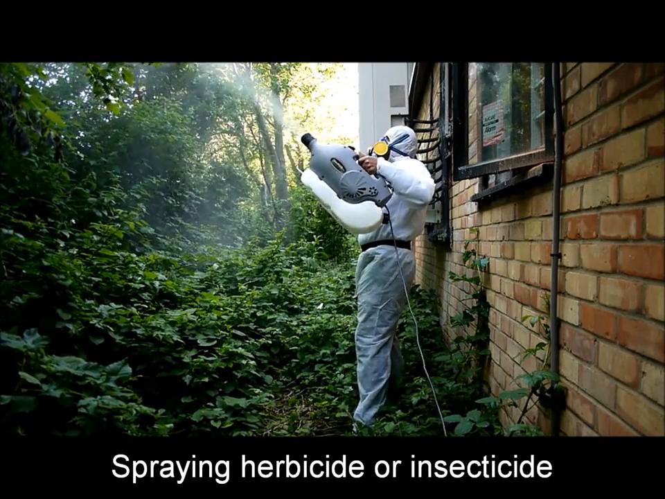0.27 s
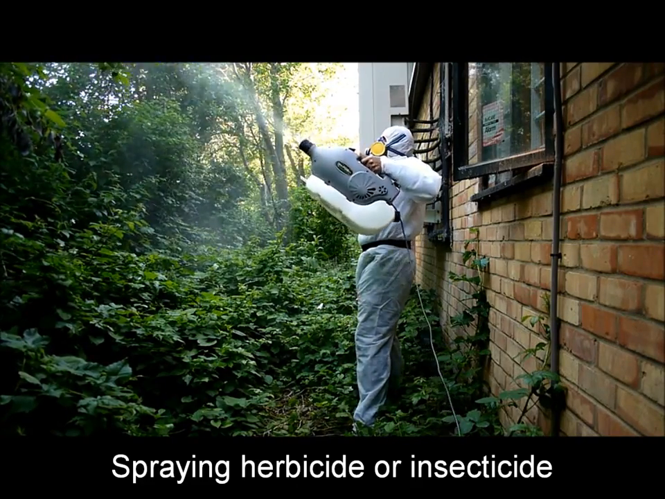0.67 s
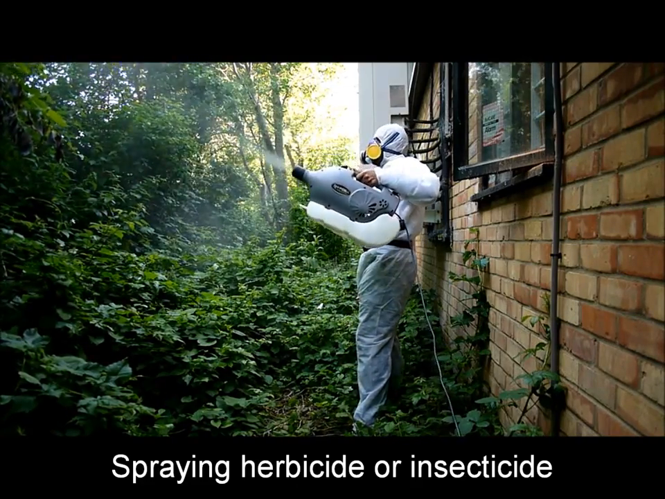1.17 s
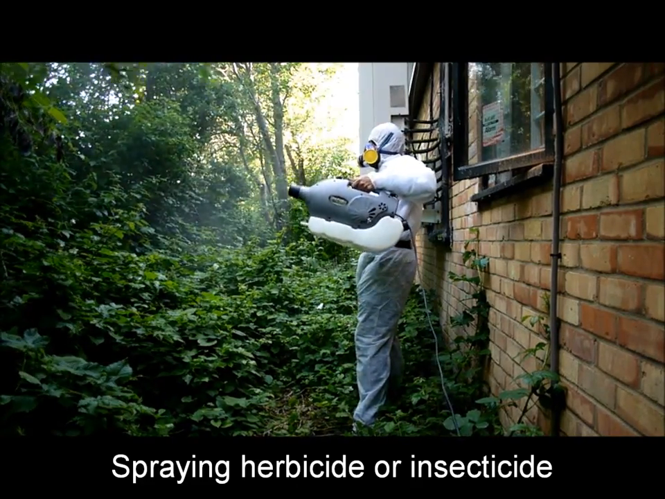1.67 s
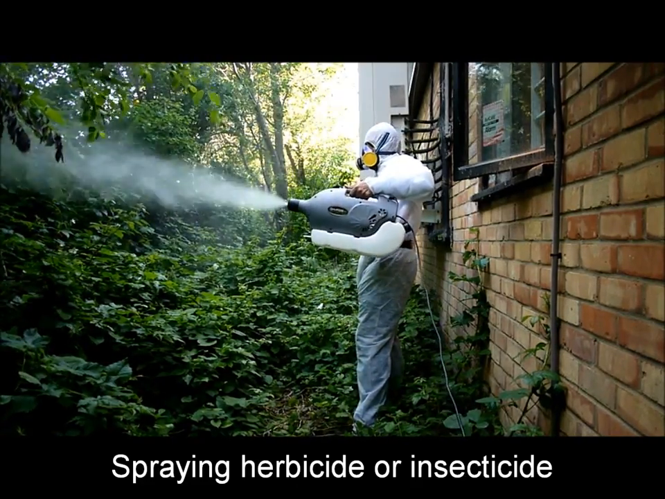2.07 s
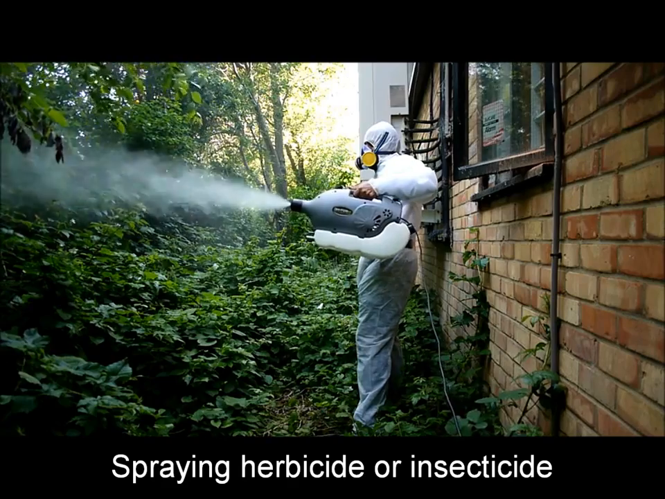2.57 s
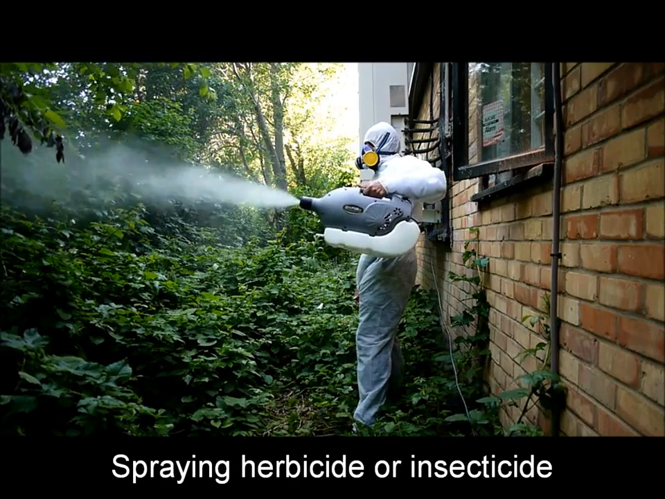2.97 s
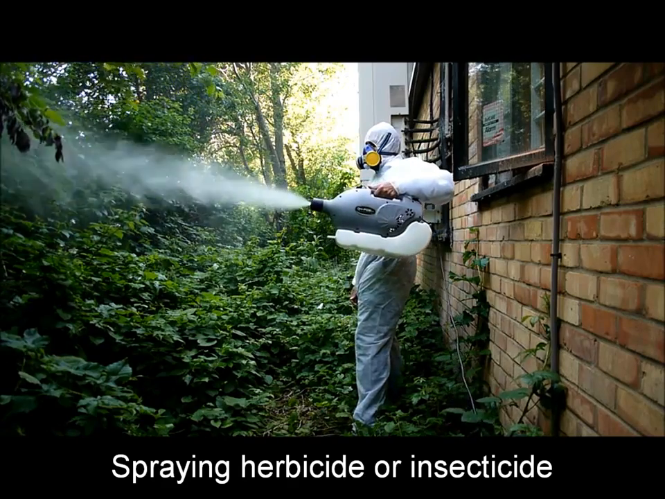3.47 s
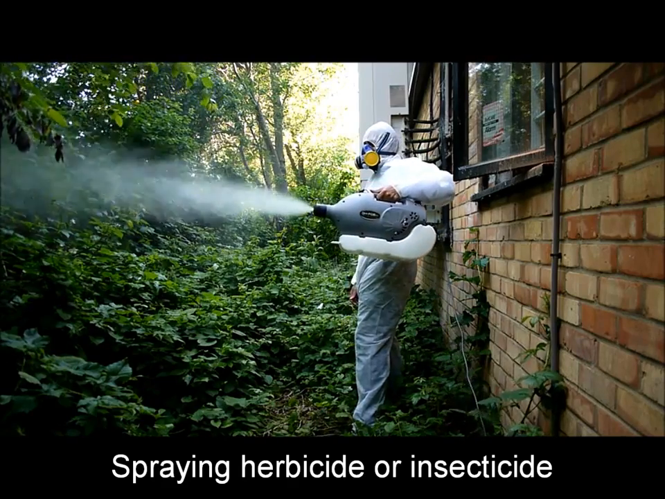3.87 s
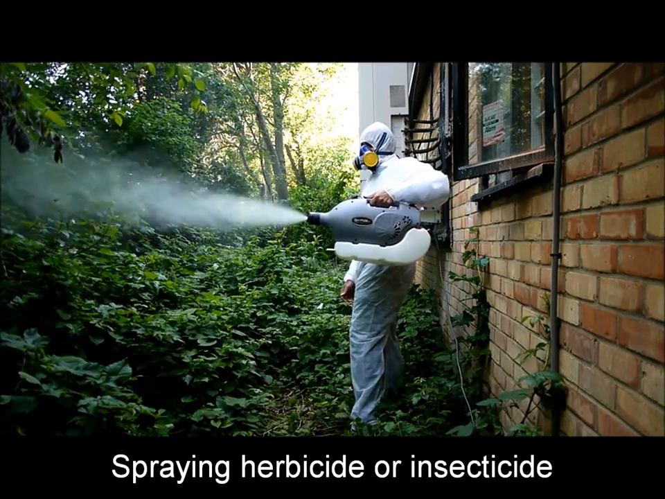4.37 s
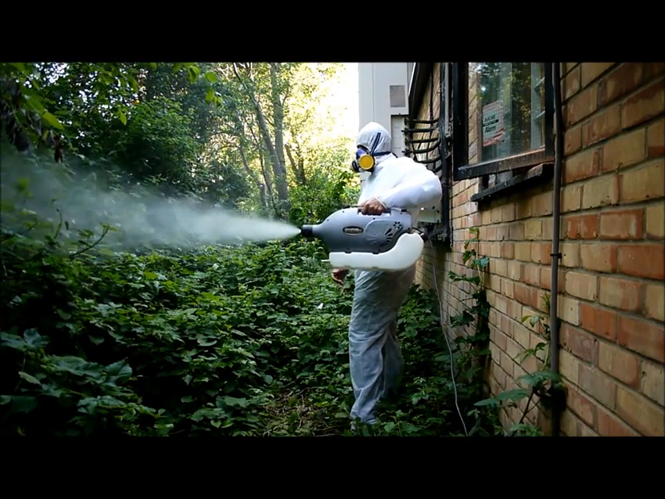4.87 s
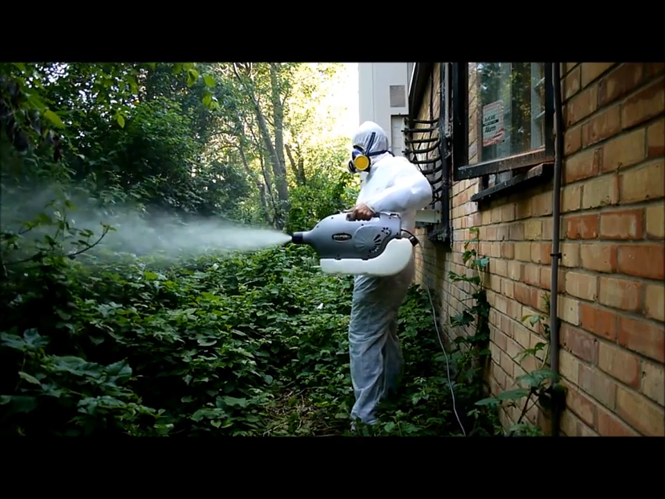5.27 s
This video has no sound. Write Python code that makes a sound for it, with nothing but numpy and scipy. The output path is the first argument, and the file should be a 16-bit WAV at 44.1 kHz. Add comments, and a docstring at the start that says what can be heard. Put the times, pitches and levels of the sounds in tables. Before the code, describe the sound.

Outdoor fogging machine, already running, heard in stereo from a few metres. A singing motor and thin high whistle ride on a strong airy hiss over faint hum and rumble. The jet gradually softens; near 1.9 seconds a tiny pop begins a gulping wet rush with more body. After 2.7 seconds it smooths into a softly hooting hiss and fades steadily to nothing.

```python
"""An overgrown garden, beside a brick wall: an electric fogger runs a few metres from the microphone.
Its motor sings a sine at the shaft rate, the nine-bladed fan whistles nine times higher, over hum and rumble.
The air jet is filtered noise, combed by echoes, and hisses softer as the raised nozzle is lowered.
The liquid valve opens: bands of noise splutter, then a soft hollow note settles. The whole sound fades away."""
import sys
import numpy as np
from scipy import signal
from scipy.fft import rfft, irfft
from scipy.io import wavfile

SR = 44100
rng = np.random.default_rng(int(sys.argv[2]) if len(sys.argv) > 2 else 0)


def dump_mix(stems):
    """Bounce the given channels to the path in sys.argv[1] as a 16-bit WAV at rate SR."""
    frames = np.atleast_2d(stems).T  # one column per channel
    limited = np.clip(frames, -1, 1)  # hard clip at full scale
    pcm = np.round(limited * 32767).astype(np.int16)
    wavfile.write(sys.argv[1], SR, pcm)


N = 244314
FRAME, HOP = 1024, 256  # samples
TIME = np.arange(N) / SR
FRAME_TIME = np.arange(N // HOP + 5)[:, None] * HOP / SR  # a column, to pair with the row of BINS
BINS = np.fft.rfftfreq(FRAME, 1 / SR)
EDGE_HZ = 7850  # top of the audible band

# The nozzle starts raised and is brought down to level in one smooth move.
LOWER_FROM_S, LOWER_TO_S = 0.16, 2.25
# The valve opens; before that only a dribble (0-1) is blown out of the raised nozzle.
VALVE_S, VALVE_RISE_S, DRIBBLE = 1.872, 0.018, 0.28
# The feed splutters until the air is out of the tube, then calms to a share of it.
PRIMED_S, SETTLE_S, CALM_SHARE = 2.7, 0.16, 0.46


def amp(db):
    """Decibels to gain."""
    return 10 ** (np.asarray(db) / 20)


def unit(x):
    """Scales to rms 1."""
    return x / np.sqrt(np.mean(abs(x) ** 2) + 1e-20)


def read(points, hz):
    """Reads a spectrum table on a log-frequency axis."""
    f, value = np.transpose(points)
    return np.interp(np.log(hz + 1), np.log(f + 1), value)


def ramp(t, start, length):
    """Goes from 0 to 1 in a straight line."""
    return np.clip((t - start) / length, 0, 1)


def wander(rate, t=TIME):
    """Slow random drift of rms 1, with rates up to about `rate` a second."""
    smooth = np.exp(-(np.fft.rfftfreq(N, 1 / SR) / rate) ** 2)
    drift = unit(irfft(rfft(rng.standard_normal(N)) * smooth, N))
    return np.interp(t, TIME, drift)


def tone(hz, db):
    """A sine that follows a pitch and an rms level, from a random starting phase."""
    cycles = np.cumsum(hz * np.ones(N)) / SR + rng.random()
    return np.sqrt(2) * amp(db) * np.sin(2 * np.pi * cycles)


# Stereo likeness of the noise: pitch_hz, correlation (left to right, 0-1)
STEREO_LIKENESS = [(60, 0.93), (250, .98), (500, 1), (1000, 0.98), (2050, 0.82), (4200, 0.7), (8000, 0.91)]


def turbulence(gain):
    """Two channels of partly alike noise, shaped by the short-time spectrum `gain`, rms 1."""
    a, b, c, d = rng.standard_normal((4, len(FRAME_TIME), len(BINS)))
    same = np.clip(read(STEREO_LIKENESS, BINS), 0, 1)
    left = a + 1j * b
    right = same * left + np.sqrt(1 - same ** 2) * (c + 1j * d)
    spectra = (np.array([left, right]) * gain).swapaxes(1, 2)
    _, noise = signal.istft(spectra, nperseg=FRAME, noverlap=FRAME - HOP)
    return unit(noise[:, :N])


def raised(t):
    """How high the nozzle points: 1 aloft, 0 level."""
    return 0.5 + 0.5 * np.cos(np.pi * ramp(t, LOWER_FROM_S, LOWER_TO_S - LOWER_FROM_S))


def valve(t):
    """How far the liquid valve is open, 0-1."""
    return ramp(t, VALVE_S, VALVE_RISE_S)


def settled(t):
    """How steady the feed is: 0 spluttering, 1 primed."""
    return ramp(t, PRIMED_S, SETTLE_S)


def liquid(t):
    """Flow and splutter, both 0-1: a dribble, then the full feed."""
    dribble = DRIBBLE * raised(t) * (1 - valve(t))
    flow = dribble + valve(t)
    uneven = dribble + valve(t) * (1 - (1 - CALM_SHARE) * settled(t))
    return flow, uneven


# Colour of the low rumble: pitch_hz, density_db (per Hz, relative)
RUMBLE_COLOUR = [(20, -40), (36, -23.5), (55, -12), (80, 4), (105, -5.5), (150, -15), (220, -17.5),
                 (500, -52.5), (2000, -89.5)]


def rumble(level_db=-63.0, raised_db=7, wet_db=3, gust_db=1):
    """The airflow's low noise is louder with the nozzle raised, and again when it carries liquid."""
    db = level_db + raised_db * raised(TIME) + wet_db * valve(TIME)
    return turbulence(amp(read(RUMBLE_COLOUR, BINS))) * amp(db + gust_db * wander(2.2))


# Hum of the windings: multiple (of 100 Hz), level_db (against the jet)
WINDING_LINES = [(1, -34.5), (2, -42)]


def hum(jet_db, mains_hz=100):
    """The windings hum at multiples of the mains hum pitch."""
    return sum(tone(k * mains_hz, jet_db + db) for k, db in WINDING_LINES)


def drone(from_hz=123.5, to_hz=172, climb_s=4.5, level_db=-59.5, raised_db=9, hold_s=2.7, release_s=2.4):
    """A low tone climbs ever more slowly, is louder with the nozzle raised, and dies away."""
    hz = from_hz + (to_hz - from_hz) * (1 - np.exp(-TIME / climb_s))  # heads for to_hz
    level = level_db + raised_db * raised(TIME)
    return tone(hz, level) * (1 - ramp(TIME, hold_s, release_s))


# Moving echoes of the fan: level_db, cancel_s (time of one cancellation), shift_hz (Doppler)
FAN_REFLECTIONS = [(-48, 2.73, 1.08), (-50, 2.86, -1.34)]


def fan_level(level_db=-40, raised_db=15):
    """The whistle is beamed at the microphone while the nozzle is high; moving echoes add and cancel in turn."""
    direct = amp(level_db + raised_db * raised(TIME) ** 3)  # the power narrows the beam
    echoes = sum(amp(db) * np.exp(2j * np.pi * (TIME - cancel_s) * shift_hz)
                 for db, cancel_s, shift_hz in FAN_REFLECTIONS)
    return 20 * np.log10(abs(direct - echoes) + 1e-9)


# Level of the shaft note: time_s, level_db
SHAFT_NOTE_LEVEL = [(0.0, -23.5), (0.26, -27), (0.34, -32), (0.52, -28), (0.82, -34.8), (1.4, -29.5),
                    (1.66, -29.5), (1.86, -32.5), (1.98, -30), (2.84, -27.5), (3.62, -29), (3.94, -25.5),
                    (4.2, -29.5), (4.52, -25.5), (4.68, -30.1), (4.94, -26), (5.0, -28.5), (5.54, -28.5)]
# Faint overtones of the shaft: multiple (of the shaft pitch), level_db (against the jet, before wavering)
SHAFT_OVERTONES = [(2, -37), (3, -35.5), (6, -33.5), (12, -32)]


def motor(jet_db, shaft_hz=559.45, blades=9, shake=0.041, flutter=0.076):
    """Unbalance sings once a turn; the fan blades chop the air nine times a turn."""
    sag_hz, sag_at_s, sag_width_s = 1.3, 1.3, 0.95  # one slight, slow sag in a steady spin
    hz = shaft_hz - sag_hz * np.exp(-((TIME - sag_at_s) / sag_width_s) ** 2)
    time_s, level_db = np.transpose(SHAFT_NOTE_LEVEL)
    note = tone(hz, np.interp(TIME, time_s, level_db)) * (1 + shake * wander(25))
    whistle = tone(blades * hz, fan_level()) * (1 + flutter * wander(6))
    overtones = sum(tone(k * hz, jet_db + db + 2 * wander(1.6)) for k, db in SHAFT_OVERTONES)
    return note + whistle + overtones


# Weaker echoes from the ground and window: delay_ms (mean), strength (against the direct sound)
WEAK_ECHOES = [(1.602, 0.077), (2.199, 0.03), (2.46, 0.062), (2.981, 0.027), (3.549, 0.088)]
# The machine swings slowly to and fro, which moves the wall echo about its mean delay.
WALL_MS, SWING_MS, SWING_PERIOD_S, FARTHEST_S = 0.8944, 0.06, 3.95, 2.1


def reflections(wall_strength=0.25, sway=0.024, leaf_count=30, leaf_strength=0.05):
    """Echoes comb the spectrum; the teeth slide as the machine moves."""
    wall_ms = WALL_MS + SWING_MS * np.cos(2 * np.pi * (FRAME_TIME - FARTHEST_S) / SWING_PERIOD_S)
    turn = -2j * np.pi * BINS / 1000  # phase per millisecond of delay
    paths = 1 + wall_strength * np.exp(turn * wall_ms)
    for ms, strength in WEAK_ECHOES:
        moving_ms = ms * (1 + sway * wander(0.37, FRAME_TIME))
        paths = paths + strength * np.exp(turn * moving_ms)
    # leaves and trunks scatter many faint copies, mostly of the treble
    for ms in rng.uniform(3, 18, leaf_count):
        leaf = leaf_strength * rng.choice([-1, 1]) * BINS / (BINS + 400)
        moving_ms = ms + rng.normal() * wall_ms  # each path stretches its own way with the swing
        paths = paths + leaf * np.exp(turn * moving_ms)
    return abs(paths)


# First spit of liquid: centre_s, pitch_hz, length_s, level_db (peak)
FIRST_SPIT = (1.889, 1100, .004, -32)


def spit():
    """The first slug of liquid pops out of the nozzle as a very short sine burst."""
    centre_s, hz, length_s, db = FIRST_SPIT
    return amp(db) * np.exp(-((TIME - centre_s) / length_s) ** 2) * np.sin(2 * np.pi * hz * TIME)


def splutter(comb, level_db=-16.0, centre_hz=800, octaves=0.41, lumps_db=1.0):
    """Air pockets in the feed tube tear the liquid into uneven gulps."""
    _, amount = liquid(TIME)
    band = np.exp(-0.5 * (np.log2((BINS + 1) / centre_hz) / octaves) ** 2)
    return amount * turbulence(band * comb) * amp(level_db + lumps_db * wander(35))


# Hollow note while spluttering: pitch_hz, waver_hz, level_db (against the jet)
SPLUTTERING_NOTE = (512, 8, -15.5)
# Hollow note once settled: pitch_hz (before it sinks), waver_hz, level_db (against the jet)
SETTLED_NOTE = (501, 3, -13.5)


def nozzle_note(breath=0.48, sag_hz_per_s=3.8, build_s=0.25):
    """The flow blows a cavity note: wavering and breathy at first, then purer and slowly sinking."""
    calm = settled(TIME)
    hz, waver_hz, db = (a + (b - a) * calm for a, b in zip(SPLUTTERING_NOTE, SETTLED_NOTE))
    hz = hz - sag_hz_per_s * np.maximum(TIME - PRIMED_S, 0)
    rough = np.clip(breath * waver_hz / waver_hz.max(), 0, 1)
    swell = np.sqrt(1 - rough ** 2) + rough * wander(11)
    return ramp(TIME, VALVE_S, build_s) * swell * tone(hz + waver_hz * wander(11), db)


# Rush of the jet with air alone: pitch_hz, density_db (per Hz, relative)
AIR_COLOUR = [(170, -28.5), (270, -21.5), (345, -7.5), (420, -13), (480, -23), (820, -22.5), (1020, -17),
              (1600, -15.5), (2300, -12.5), (2850, -12), (4400, -5.5), (5250, -5), (5800, -2), (7050, 0.5),
              (7750, -3.5)]
# Rush of the jet carrying mist: pitch_hz, density_db (per Hz, relative)
MIST_COLOUR = [(170, -23.5), (260, -15.5), (345, -0.5), (420, -1.5), (620, -11.5), (1150, -9.5),
               (1600, -11), (2100, -7.5), (2800, -10.5), (3700, -4), (4800, -4), (6000, -.5), (7400, 0.5),
               (7800, -2.5)]
# Ring of the wet nozzle tube: pitch_hz, width_hz (half-width of the peak), boost_db
TUBE_RING = (3690, 36, 5.5)


def jet(comb, level_db=1.5, flutter_db=0.57):
    """Air rushes from the nozzle; the liquid damps its top and fills its middle."""
    flow, _ = liquid(FRAME_TIME)
    ring_hz, width_hz, ring_db = TUBE_RING
    wet_db = read(MIST_COLOUR, BINS) + ring_db / (1 + ((BINS - ring_hz) / width_hz) ** 2)
    gain = comb * amp((1 - flow) * read(AIR_COLOUR, BINS) + flow * wet_db)
    gain = gain * (BINS < EDGE_HZ + 300)
    gain = gain * BINS ** 2 / (BINS ** 2 + 90 ** 2)  # a small nozzle radiates little bass
    gain /= np.sqrt(np.mean(gain ** 2, axis=1, keepdims=True))  # colour only: even level in every frame
    return turbulence(gain) * amp(level_db + flutter_db * wander(25))


def scene(level_db=-26.0, raised_db=3.5, wet_db=-2.5, choke_db=-1, choke_s=0.12):
    """The jet is louder with the nozzle raised, softer with liquid; the first slug briefly chokes it."""
    choke = choke_db * np.exp(-np.maximum(TIME - VALVE_S, 0) / choke_s)
    jet_db = level_db + raised_db * raised(TIME) + (wet_db + choke) * valve(TIME)
    comb = reflections()
    background = rumble() + hum(jet_db) + drone()
    air = jet(comb) + splutter(comb) + nozzle_note()
    return background + motor(jet_db) + spit() + air * amp(jet_db)


# Lead of the left port: pitch_hz, lead_rad (left ahead of right)
LEFT_LEAD = [(20, 0.056), (150, 0.1), (560, 0.41), (1600, 0.76), (2600, .85), (4400, 0.62), (6500, 0.66),
             (8200, 0.16)]
# Balance of the ports: pitch_hz, balance_db (left over right)
LEFT_BALANCE = [(60, 2), (300, 1.2), (560, 1), (1000, 0), (2800, 1), (5000, -0.5), (8000, 0)]


def record(dry, low_cut_hz=55, fade_from_s=2.674, silent_s=5.808):
    """Close microphone ports, left earlier and mostly louder; a wind filter; a straight fade; the band limit."""
    hz = np.fft.rfftfreq(N, 1 / SR)
    port = amp(read(LEFT_BALANCE, hz) / 2) * np.exp(0.5j * read(LEFT_LEAD, hz))
    heard = irfft(rfft(dry) * np.array([port, 1 / port]), N)  # half the difference to each side
    wind_filter = signal.butter(4, low_cut_hz, "high", fs=SR, output="sos")
    heard = signal.sosfilt(wind_filter, heard)
    heard = heard * (1 - ramp(TIME, fade_from_s, silent_s - fade_from_s))
    low_pass = signal.firwin(401, EDGE_HZ, window=("kaiser", 9), fs=SR)
    return signal.oaconvolve(heard, low_pass[None], "same")


dry = scene()
out = record(dry)
dump_mix(out)
```